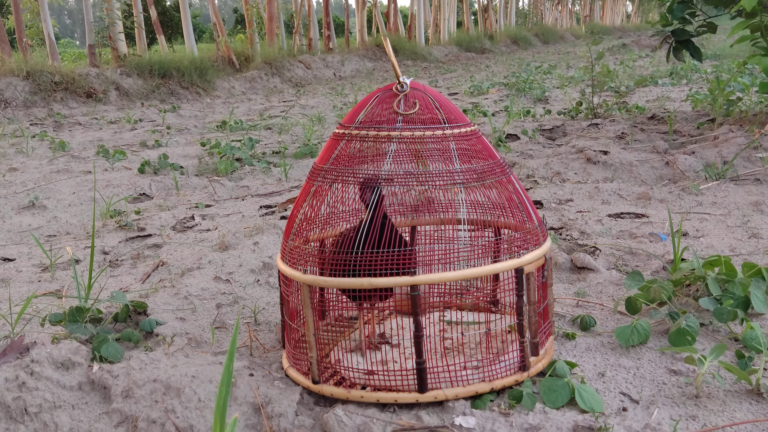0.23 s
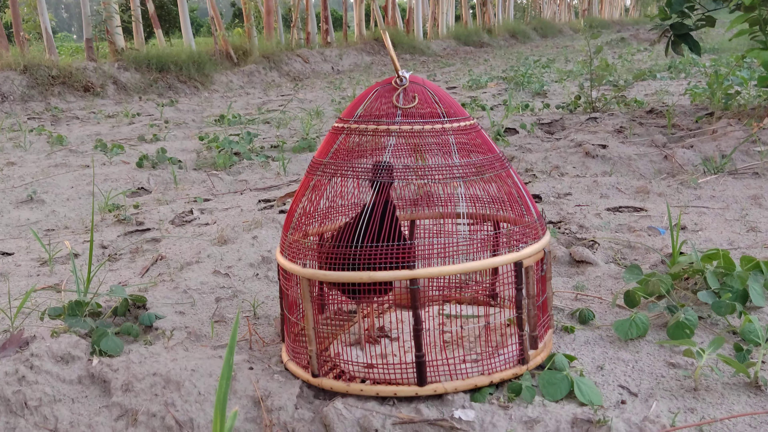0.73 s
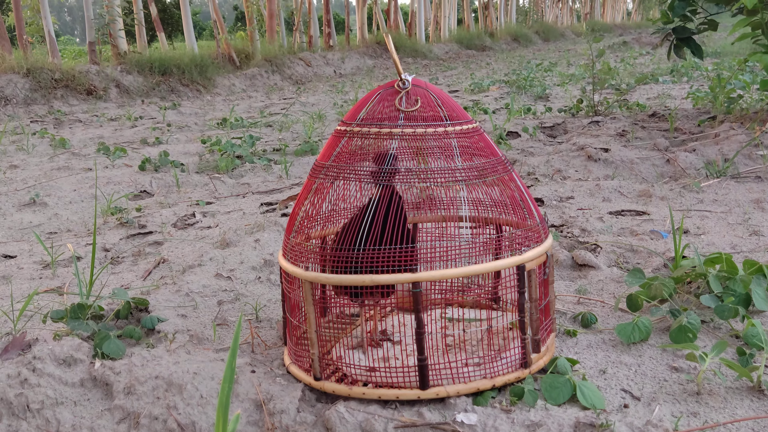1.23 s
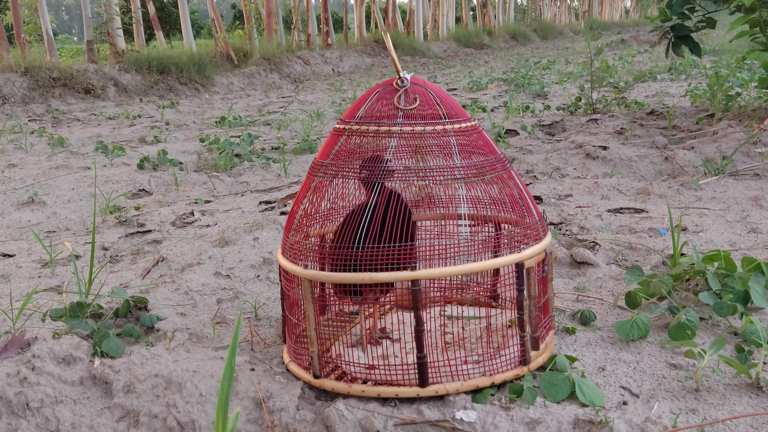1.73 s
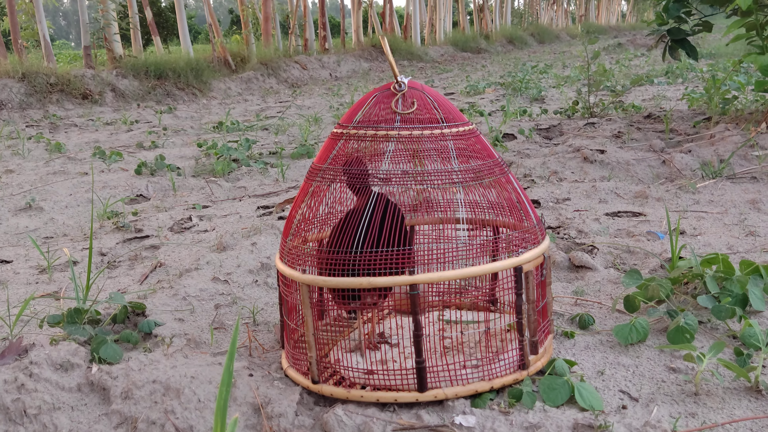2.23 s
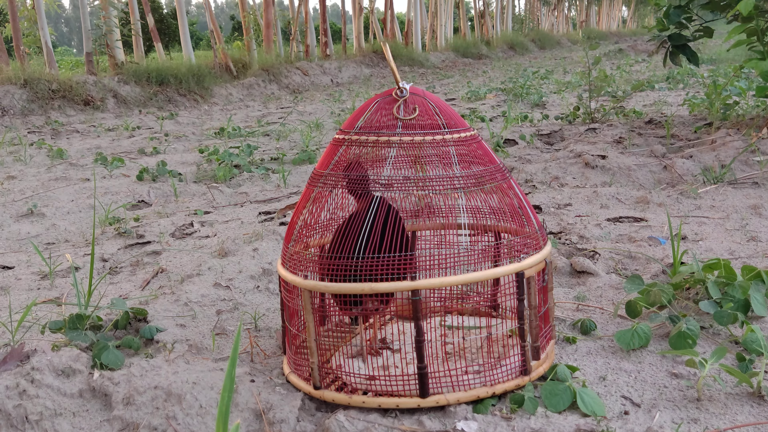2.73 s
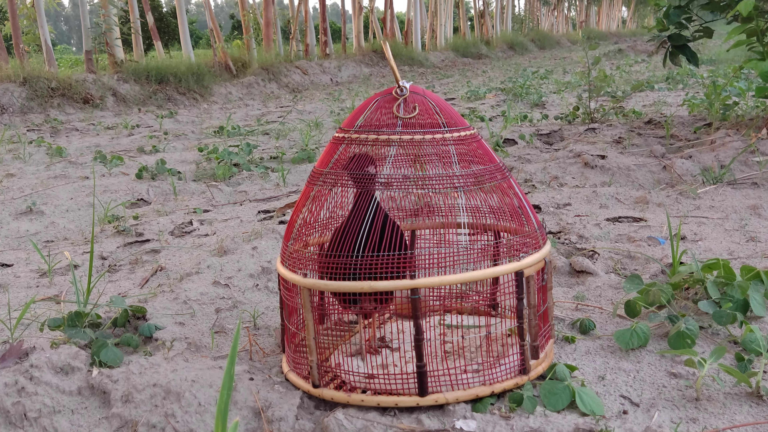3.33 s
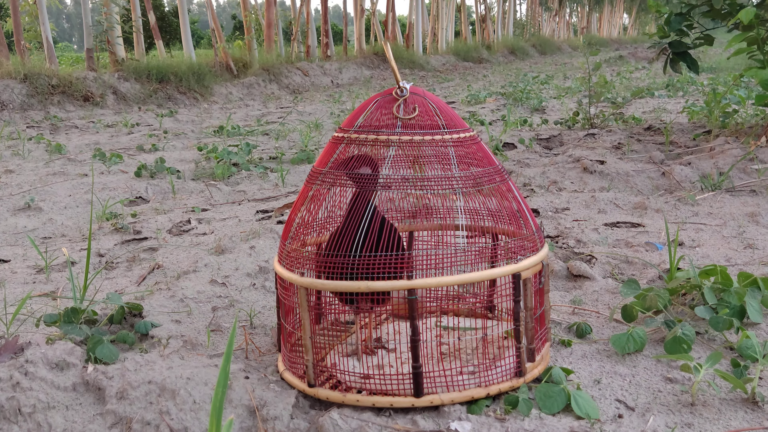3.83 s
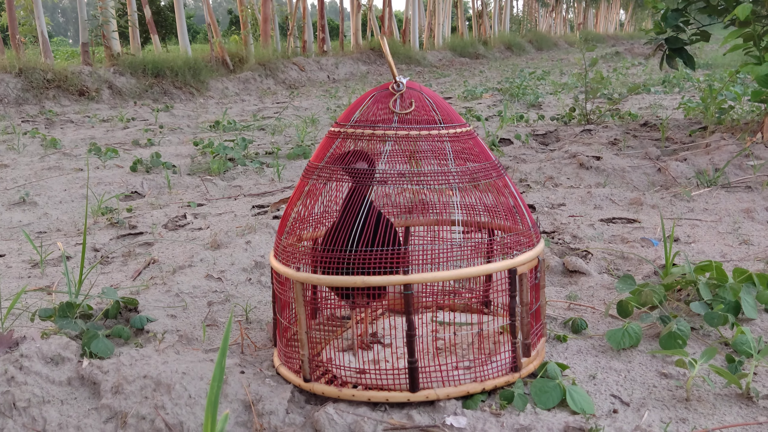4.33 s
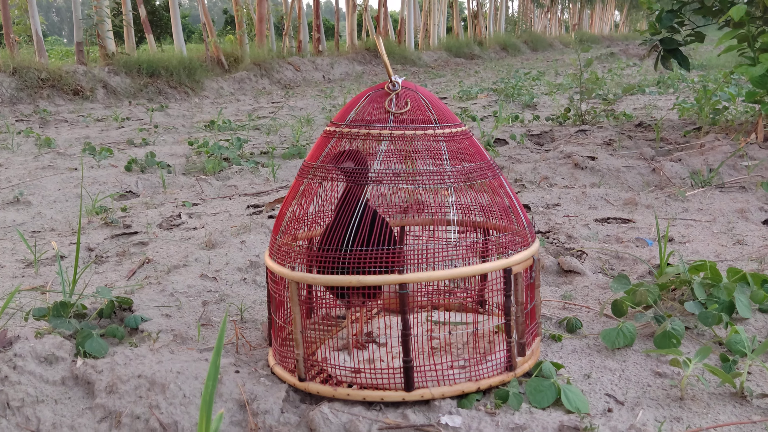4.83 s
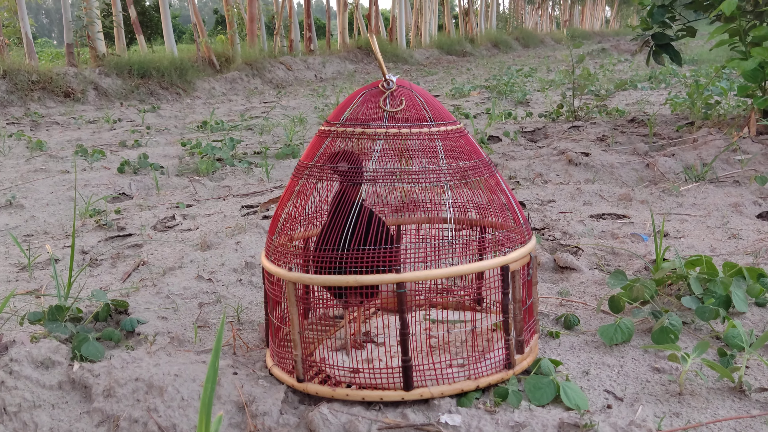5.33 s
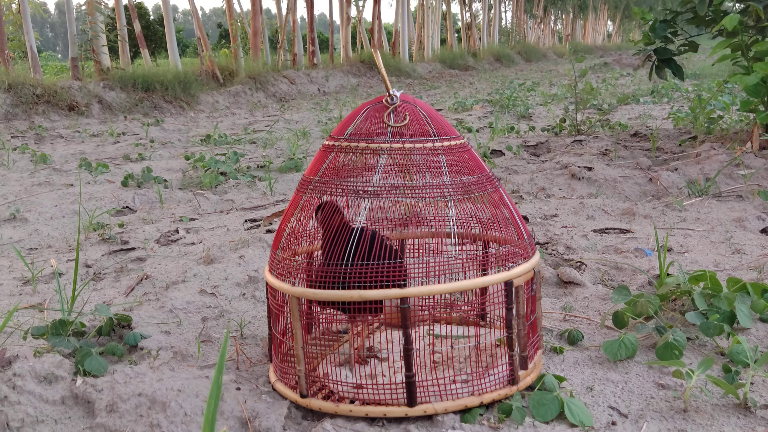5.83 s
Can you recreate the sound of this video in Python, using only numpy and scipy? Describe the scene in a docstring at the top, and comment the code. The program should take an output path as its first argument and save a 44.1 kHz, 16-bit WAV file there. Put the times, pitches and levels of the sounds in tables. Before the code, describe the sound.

Quiet open ground with a low soft rumble and faint steady hiss. After about a second and a half a caged francolin close by blurts a clipped chirp, then four very loud, metallic, buzzing notes: two longer ones, a short strongest one and a last medium one. A faint echo from trees follows, then near quiet with tiny distant bird peeps. Close stereo microphones, bird slightly left, louder on the left.

```python
"""Call of a black francolin

A black francolin in a wicker cage on open sandy ground gives one loud five-note call.
Its voice is one whistle swept up and down some 250 times a second, creaky at the note edges;
now and then it catches on one pitch, as a pip or a high squeal. Ground, cage and trees echo it.
Small birds call far off as gliding sines, over a low rumble and a hiss of filtered noise.
Each microphone is limited on its own, which ducks the background and evens out the peaks."""
import sys
import numpy as np
from scipy import signal
from scipy.fft import rfft, irfft, next_fast_len
from scipy.io import wavfile
from scipy.ndimage import uniform_filter1d, minimum_filter1d

SR = 44100
rng = np.random.default_rng(int(sys.argv[2]) if len(sys.argv) > 2 else 0)


def unload_wav(signal):
    """Save mono or channel-first audio to the path in sys.argv[1] as 16-bit WAV at rate SR, clipped to [-1, 1]."""
    wavfile.write(
        sys.argv[1],
        SR,
        np.round(np.clip(np.atleast_2d(signal).T, -1, 1) * 32767).astype(np.int16),
    )


N = 268348
TIME = np.arange(N) / SR

# Spectrum of the low rumble: f/Hz, relative level per Hz/dB
RUMBLE_SPECTRUM = [(20, -22.5), (38, -24), (47, 1), (55, 0), (68, -5.5), (105, -5), (118, -4.5), (134, -11),
                   (200, -14.5), (300, -19.5), (600, -27.5), (1500, -54)]
# Spectrum of the hiss: f/Hz, relative level per Hz/dB
HISS_SPECTRUM = [(100, -9.5), (500, 7.5), (1000, 4), (2000, 1), (4300, 0), (6000, -6), (7300, -14),
                 (8400, -30.5), (9500, -11.5), (11000, -5.5), (13000, 1.5), (16000, 1)]
# Far small birds: start t/s, length t/s, first f/Hz, last f/Hz, mean level/dB
FAR_CALLS = [(1.337, 0.041, 6050, 3020, -42), (1.372, 0.059, 3310, 3400, -47),
             (4.42, 0.076, 5140, 4800, -53.5), (4.52, 0.13, 4480, 4460, -52), (4.913, .13, 4350, 4300, -52),
             (5.26, 0.1, 4160, 4280, -52), (5.622, 0.053, 4400, 5100, -51.5)]
# Notes, the first three run together as the opening chirp: start t/s, end t/s, attack t/s,
# release t/s, level/dB, nominal bottom of the sweep f/Hz, nominal top f/Hz, nominal sweeps per s,
# pitch rise over the note (share), creak level relative to the note/dB
CALL_NOTES = [(1.614, 1.621, 0.002, 0.0028, 3.5, 2590, 3550, 250, 0, -7),
              (1.620, 1.642, 0.0031, .016, 14.5, 2476, 2980, 260, 0.012, 1),
              (1.651, 1.695, 0.0025, 0.0081, 17.5, 2378, 5020, 290, -0.0072, -1),
              (2.099, 2.266, 0.0082, .024, 19.5, 2810, 6353, 268, 0.081, -7.5),
              (2.448, 2.638, .024, 0.021, 17, 2584, 6213, 273, -0.0069, -5.5),
              (2.915, 3.01, 0.037, .026, 26, 2574, 6230, 276, 0.014, -7),
              (3.061, 3.216, 0.042, 0.023, 17.5, 2593, 6157, 254, -.02, -7)]
# Holds, where the voice catches on one pitch: start t/s, end t/s, pitch f/Hz, arch f/Hz,
# warble width f/Hz, warbles per s
PITCH_HOLDS = [(1.616, 1.628, 2557, -3.5, 197, 250.5), (1.651, 1.686, 6163, 523.5, 903.5, 400),
               (2.101, 2.105, 5533, 67.5, 150, 234), (2.583, 2.608, 5744, 701, 900, 750),
               (3.141, 3.158, 6210, 260, 840, 750)]
# Windpipe resonances rung by the creak: f/Hz, bandwidth f/Hz, relative level/dB
THROAT_RESONANCES = [(1534, 165.6, 0.5), (2764, 300, 12), (3870, 760, -5.5), (5560, 695, -6.5)]
# Spectrum of the breathy edge of the voice: f/Hz, relative level per Hz/dB
RASP_SPECTRUM = [(100, -11), (500, 6.5), (1600, -3.5), (4000, -7.5), (8000, 8.5), (10300, -1.5),
                 (12500, -6.5), (16000, -11)]
# Bounces off the uneven ground and the cage, a list for each of left and right:
# delay t/ms, level relative to the direct voice/dB
GROUND_AND_CAGE = [
    [(.688, 2), (.778, 2.5), (2.02, -5), (3.05, -29)],
    [(.706, 4), (1.038, -3.5), (1.98, -7.5), (3.25, -4.5)],
]
# Colour of the voice, shaped by its throat and by the path to each microphone, a list for left and right: f/Hz,
# gain/dB
VOICE_COLOURS = [
    [(1500, -3), (2300, -4), (2850, -2), (3400, 2), (4200, 9), (4700, -1.5), (5100, 12), (5700, 0),
     (6500, 4.5), (7200, -4), (13000, 1)],
    [(1500, -4), (2300, -1.5), (2850, 4.5), (3400, 1), (4200, 3.5), (4700, -3.5), (5100, -2), (5700, -10.5),
     (6500, 5.5), (7200, -5.5), (13000, -6)],
]
# Spectrum of the tree echo: f/Hz, relative level/dB
TREE_SPECTRUM = [(1000, -35), (2500, -11), (3000, 1.5), (3400, -2), (4250, 6), (4800, -1), (6000, -0.5),
                 (8000, -7.5), (11000, 6), (15000, -10)]

# background levels/dB, left and right: the right microphone is the less sensitive one
RUMBLE_DB, HISS_DB = [[-33], [-47.5]], [[-41], [-51]]
RIGHT_DB, RIGHT_LAG_MS = -8, 0.18   # voice and far birds at the right microphone
CUTOFF_HZ = 15800

ONSET_DB, END_DB = -4, -15.5   # level as a note starts and as it dies
SLACK_BOTTOM_HZ, SLACK_TOP_HZ = 2695, 4864   # with no effort the sweep shrinks to this range
OPENING_POWER = 1.2   # how the sweep widens with effort
RATE_ARCH, PITCH_ARCH = .14, 0.048   # shares by which both ends of a note are slower and flatter
FULL_CREAK, CREAK_POWER = 0.41, 1.04   # creak left at full effort; how soon it clears
HOLD_GLIDE_S, HOLD_CREAK = 0.0018, 0.25   # time to slip into a held pitch; creak while there
TREMOR_DB, TREMOR_PER_S = 2, 31.6   # unsteady breath pressure
REACH_WANDER, REACH_PER_S = .028, 110   # the top of the sweep wanders by this share


def from_db(db):
    """A level in decibels is a logarithm of amplitude; this returns the amplitude gain."""
    return 10 ** (np.asarray(db) / 20)


def rms_one(x):
    """Normalization: dividing by the root mean square gives unit effective amplitude."""
    return x / np.sqrt(np.mean(x ** 2) + 1e-20)


def colour(x, points):
    """Linear filtering: the spectrum is multiplied by a gain curve through (f/Hz, level/dB) points."""
    hz, db = np.transpose(points)
    size = next_fast_len(x.shape[-1])
    bins_hz = np.maximum(np.arange(size // 2 + 1) * SR / size, 1)
    gain = from_db(np.interp(np.log(bins_hz), np.log(hz), db))
    return irfft(rfft(x, size) * gain, size)[..., :x.shape[-1]]


def noise(points):
    """Coloured noise: white noise filtered to a given spectrum, at unit rms."""
    return rms_one(colour(rng.standard_normal(N), points))


def drift(per_s):
    """Random modulation: low-passed noise gives a smooth wander of unit rms."""
    lowpass = signal.butter(2, per_s, fs=SR, output="sos")
    return rms_one(signal.sosfilt(lowpass, rng.standard_normal(N)))


def resonate(x, hz, width_hz):
    """Resonance: a pole pair rings at hz, its damping sets the bandwidth; the peak gain is one."""
    radius = np.exp(-np.pi * width_hz / SR)
    zeros = np.array([1, 0, -1]) * (1 - radius * radius) / 2
    poles = [1, -2 * radius * np.cos(2 * np.pi * hz / SR), radius * radius]
    return signal.lfilter(zeros, poles, x)


def delayed(x, paths):
    """Superposition: one copy of x for each path; a delay is a phase linear in frequency."""
    size = next_fast_len(N)
    khz = np.arange(size // 2 + 1) * SR / size / 1000
    transfer = sum(from_db(db) * np.exp(-2j * np.pi * khz * ms) for ms, db in paths)
    return irfft(rfft(x, size) * transfer, size)[:N]


def ramp(x):
    """Smooth transition: a quarter sine from 0 to 1."""
    return np.sin(np.pi / 2 * np.clip(x, 0, 1))


def background():
    """Coherence: the rumble reaches both microphones alike, while each has its own hiss."""
    rumble = from_db(RUMBLE_DB) * noise(RUMBLE_SPECTRUM)
    hiss = from_db(HISS_DB) * np.array([noise(HISS_SPECTRUM), noise(HISS_SPECTRUM)])
    return rumble + hiss


def far_birds(waver=0.0114, flicker=0.55):
    """Frequency modulation: thin gliding sines, their pitch and level blurred by distance."""
    out, wander = np.zeros(N), 1 + waver * drift(297)
    for start, length, first_hz, last_hz, db in FAR_CALLS:
        along = np.clip((TIME - start) / length, 0, 1)
        hz = (first_hz + (last_hz - first_hz) * along) * wander
        whistle = np.sin(2 * np.pi * np.cumsum(hz) / SR)
        out += from_db(db) * np.sin(np.pi * along) * whistle
    return out * (1 + flicker * drift(80))


def note_controls():
    """Effort swells, stays and lets go in a note: it raises level, widens the sweep, clears creak."""
    gain, creak_gain, effort = np.zeros((3, N))
    bottom, top, per_s = [np.full(N, 1. * v) for v in CALL_NOTES[0][5:8]]
    for start, end, attack, release, db, bottom_hz, top_hz, sweeps, rise, creak_db in CALL_NOTES:
        on = (TIME > start) & (TIME < end)
        t = TIME[on]
        swell = ramp((t - start) / attack)
        fade = np.clip((end - t) / release, 0, 1)
        along = (t - start) / (end - start) - .5   # -0.5 to 0.5 over the note
        arch = (2 * along) ** 2                    # 1 at both ends, 0 in the middle
        effort[on] = swell * fade
        creak_gain[on] = from_db(creak_db)
        gain[on] = from_db(db + (ONSET_DB - db) * (1 - swell) + (END_DB - db) * (1 - fade))
        pitch = 1 + rise * along - PITCH_ARCH * arch
        bottom[on], top[on] = bottom_hz * pitch, top_hz * pitch
        per_s[on] = sweeps * (1 - RATE_ARCH * arch)
    top *= 1 + REACH_WANDER * drift(REACH_PER_S)
    wide = effort ** OPENING_POWER
    bottom = SLACK_BOTTOM_HZ + (bottom - SLACK_BOTTOM_HZ) * wide
    top = SLACK_TOP_HZ + (top - SLACK_TOP_HZ) * wide
    creak = 1 - (1 - FULL_CREAK) * effort ** CREAK_POWER
    breath = uniform_filter1d(gain, size=40) * from_db(TREMOR_DB * drift(TREMOR_PER_S))
    return breath, creak_gain, *with_holds([bottom, top, per_s, creak])


def with_holds(sweep):
    """Locking: in a hold the wide sweep collapses to a smaller warble round one arching pitch."""
    out = np.array(sweep)
    for start, end, hz, arch_hz, warble_hz, warbles in PITCH_HOLDS:
        on = (TIME > start - HOLD_GLIDE_S) & (TIME < end + HOLD_GLIDE_S)
        t = TIME[on]
        held = np.clip(np.minimum(t - start, end - t) / HOLD_GLIDE_S + .5, 0, 1)
        centre = hz + arch_hz * ramp(1 - (2 * (t - start) / (end - start) - 1) ** 2)
        targets = (centre - warble_hz / 2, centre + warble_hz / 2, warbles, HOLD_CREAK)
        for control, target in zip(out, targets):
            control[on] += held * (target - control[on])
    return out


def francolin(dwell=1.8, rate_jitter=.03, pitch_jitter=.025, pulse_depth=0.04,
              overtone_db=-23, rasp_db=-23):
    """Modulation: a slow flutter of the syrinx sweeps a whistle; at low effort it chops it to pulses."""
    gain, creak_gain, bottom_hz, top_hz, per_s, creak = note_controls()
    creak = np.clip(creak, 0, 1)
    cycle = np.cumsum(per_s * (1 + rate_jitter * drift(155))) / SR
    tension = (.5 - .5 * np.cos(2 * np.pi * cycle)) ** dwell   # lingers at the bottom of each sweep
    span = np.sqrt(np.abs(1 - bottom_hz / top_hz))             # wide sweeps are rough, narrow ones pure
    hz = (bottom_hz + (top_hz - bottom_hz) * tension) * (1 + pitch_jitter * span * drift(900))
    phase = 2 * np.pi * np.cumsum(hz) / SR
    opening = 1 - np.clip(pulse_depth + creak, 0, 1) * (1 - tension)
    # for the fundamental, the open beak passes only the band of the sweep
    beak = signal.cheby1(8, .5, [2350, 6950], "band", fs=SR, output="sos")
    fundamental = signal.sosfilt(beak, np.sin(phase) * opening)
    whistle = fundamental + from_db(overtone_db) * np.sin(2 * phase) * opening
    # each pulse of air rings the windpipe
    puffs = rng.standard_normal(N) * tension ** 2
    throat = rms_one(sum(from_db(db) * resonate(puffs, centre, width)
                         for centre, width, db in THROAT_RESONANCES))
    rasp = from_db(rasp_db) * span * noise(RASP_SPECTRUM)
    return gain * (whistle + creak_gain * creak ** 2 * throat + rasp)


def ground_and_cage(voice, paths):
    """Interference: early bounces off ground and cage add to the direct voice."""
    return voice + delayed(voice, paths)


def voice_colour(x, points):
    """Frequency response: a short filter gives the voice its broad (f/Hz, gain/dB) shape as heard at one
    microphone."""
    hz, db = np.transpose(points)
    grid_hz = np.linspace(0, SR / 2, num=257)
    taps = signal.firwin2(129, grid_hz, from_db(np.interp(grid_hz, hz, db)), fs=SR)
    return signal.fftconvolve(x, taps, "same")


def tree_echo(voice, t60=0.45, build_s=0.018, echo_db=-33):
    """Scattering: trunks and leaves return a faint tail that builds up and decays 60 dB in t60 seconds."""
    t = TIME[:SR]
    envelope = from_db(-60 * t / t60) * (1 - np.exp(-(t / build_s) ** 2))
    tail = colour(rng.standard_normal(SR), TREE_SPECTRUM) * envelope
    return from_db(echo_db) * signal.fftconvolve(voice, tail / np.linalg.norm(tail))[:N]


def scene():
    """Path difference: the bird sits a little to the left, so the right microphone hears it later."""
    voice, far = francolin(), far_birds()
    ears = []
    for paths, port in zip(GROUND_AND_CAGE, VOICE_COLOURS):
        near = voice_colour(ground_and_cage(voice, paths), port)
        ears.append(near + tree_echo(voice) + far)
    left, right = ears
    return np.array([left, delayed(right, [(RIGHT_LAG_MS, RIGHT_DB)])]) + background()


def limiter(x, ceiling_db, release_db_per_s, size):
    """Gain control: each channel is turned down just ahead of its peaks and recovers at a steady rate."""
    over_db = np.maximum(20 * np.log10(np.abs(x) + 1e-9) - ceiling_db, 0)
    recovery_db = release_db_per_s * TIME
    held_db = np.maximum.accumulate(over_db + recovery_db, axis=1) - recovery_db
    ahead_db = minimum_filter1d(-held_db, size=size)
    return x * from_db(uniform_filter1d(ahead_db, size=size))


def record(dry):
    """Dynamics: a slow limiter ducks the background, a fast one evens the peaks, then the top is cut."""
    ducked = limiter(dry, ceiling_db=10.5, release_db_per_s=263.5, size=41)
    level = limiter(ducked, ceiling_db=-.7, release_db_per_s=2500, size=21)
    lowpass = signal.ellip(12, .1, 70, CUTOFF_HZ, fs=SR, output="sos")
    return signal.sosfilt(lowpass, level)


dry = scene()
out = record(dry)
unload_wav(out)
```